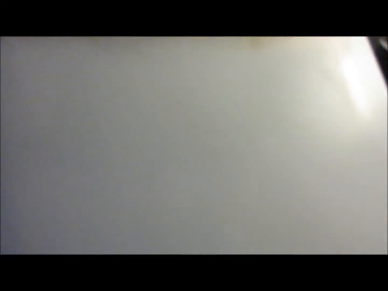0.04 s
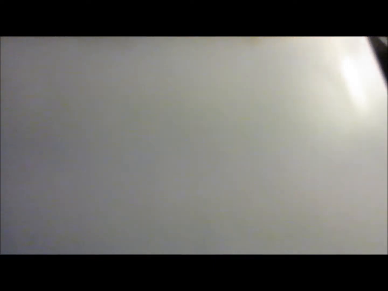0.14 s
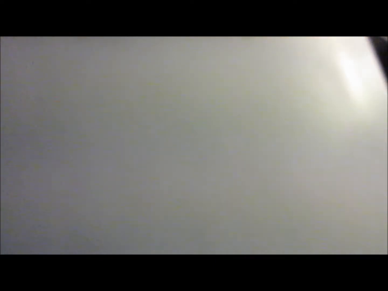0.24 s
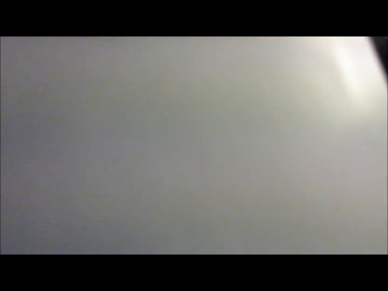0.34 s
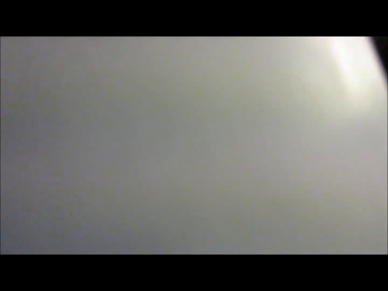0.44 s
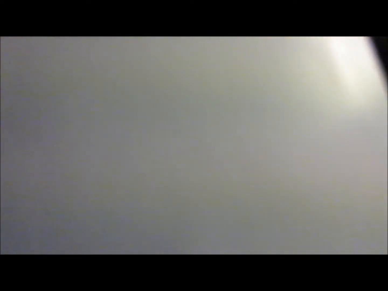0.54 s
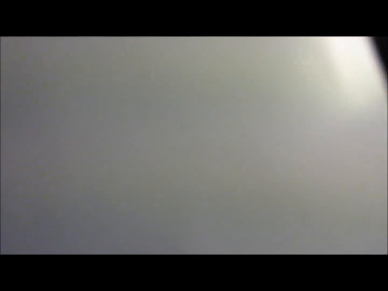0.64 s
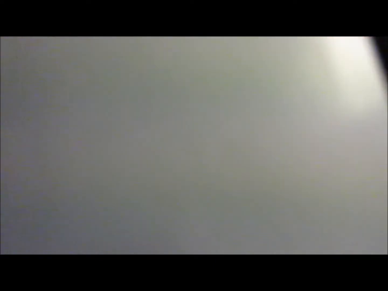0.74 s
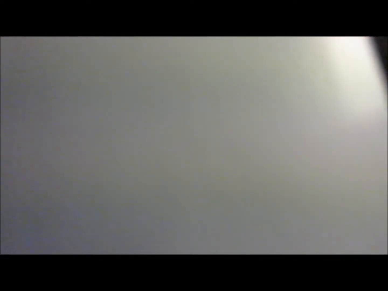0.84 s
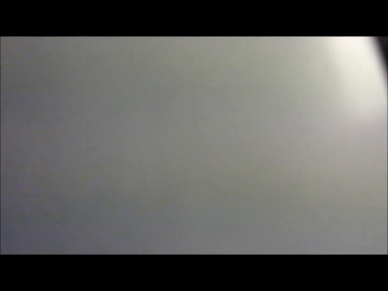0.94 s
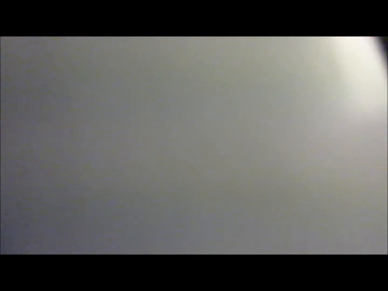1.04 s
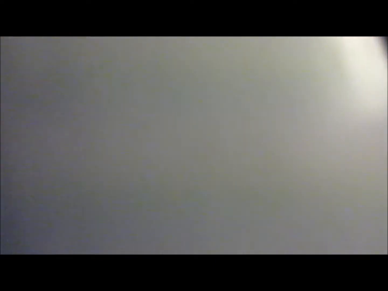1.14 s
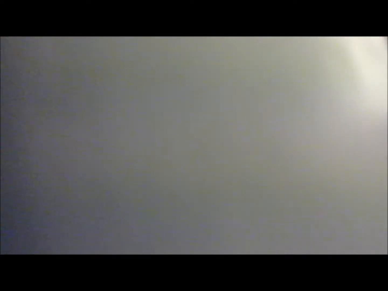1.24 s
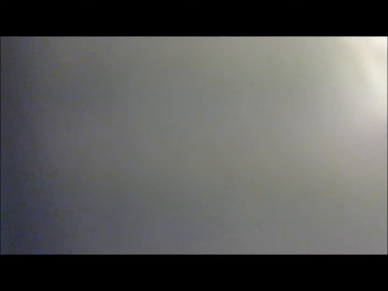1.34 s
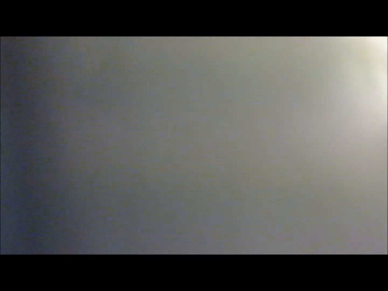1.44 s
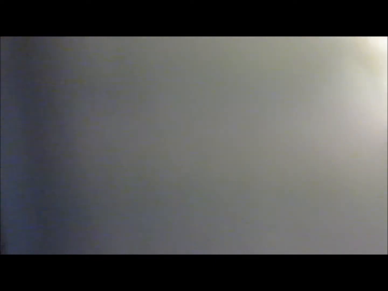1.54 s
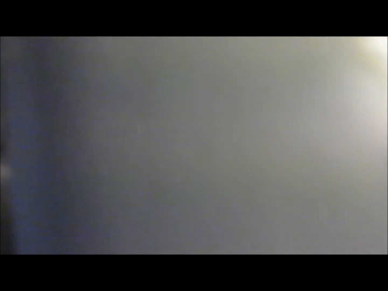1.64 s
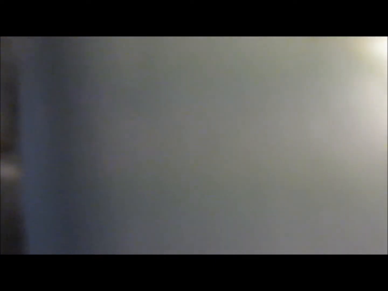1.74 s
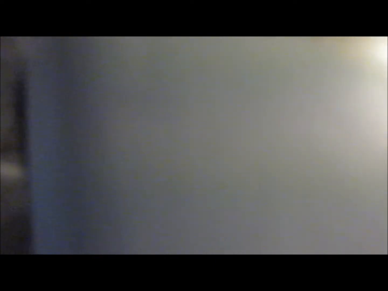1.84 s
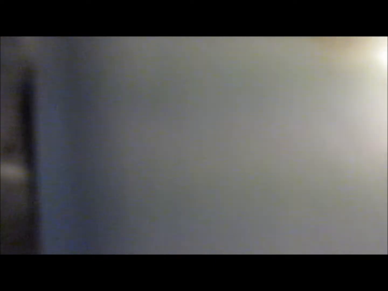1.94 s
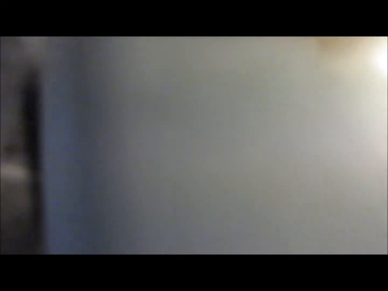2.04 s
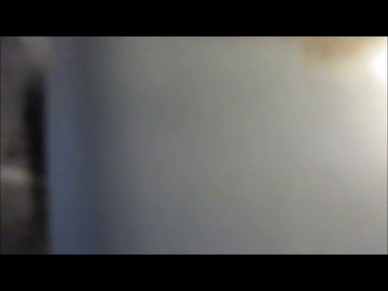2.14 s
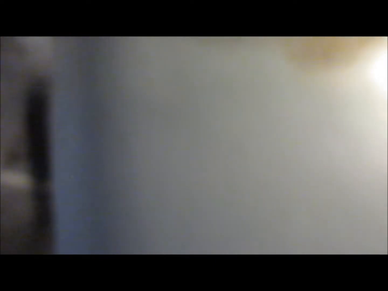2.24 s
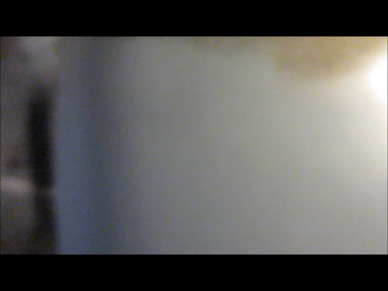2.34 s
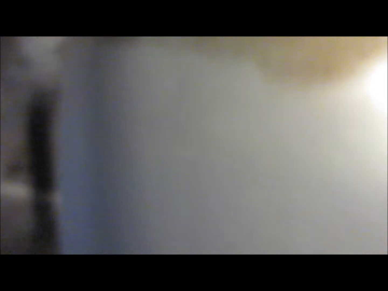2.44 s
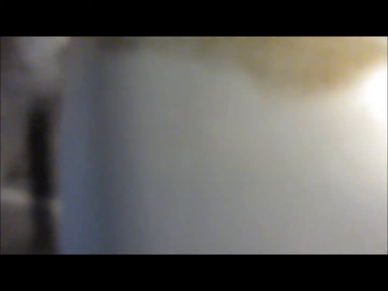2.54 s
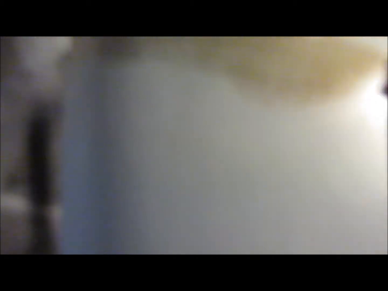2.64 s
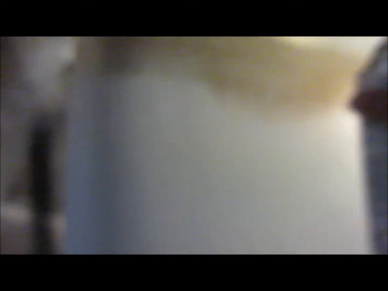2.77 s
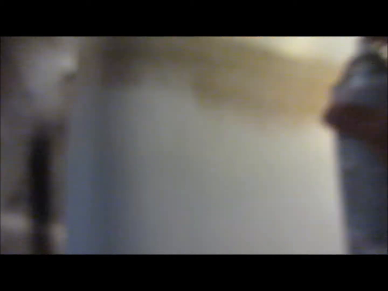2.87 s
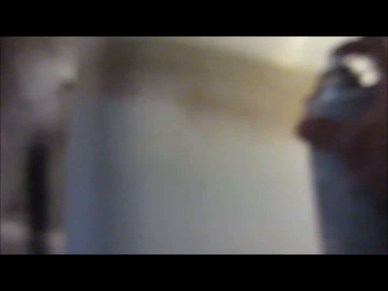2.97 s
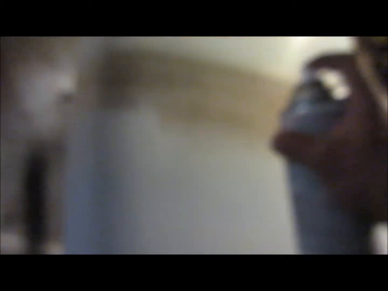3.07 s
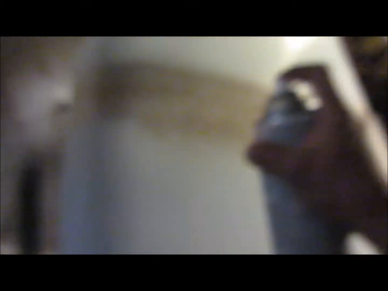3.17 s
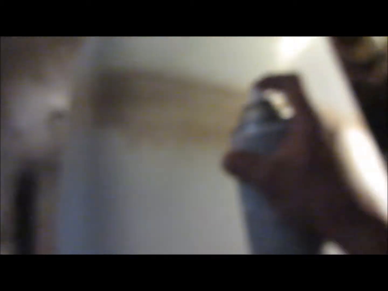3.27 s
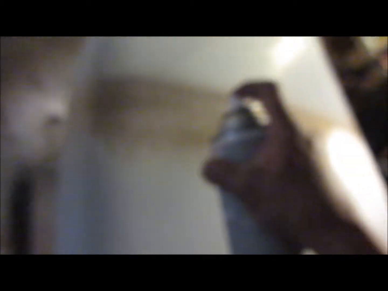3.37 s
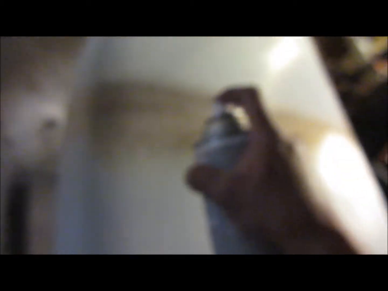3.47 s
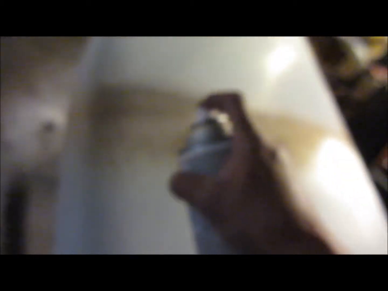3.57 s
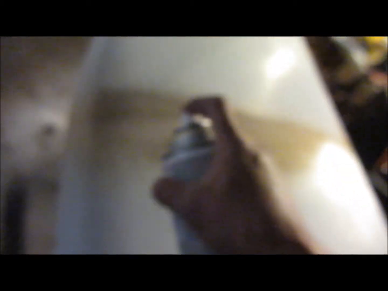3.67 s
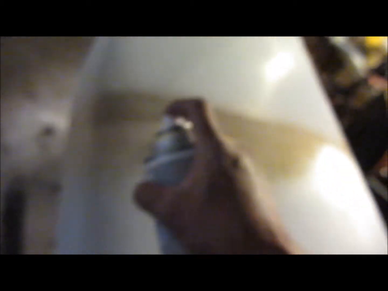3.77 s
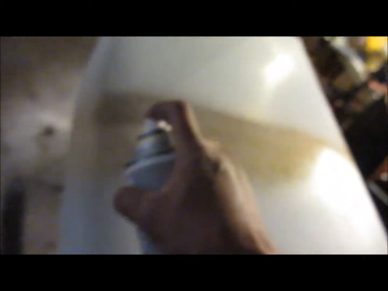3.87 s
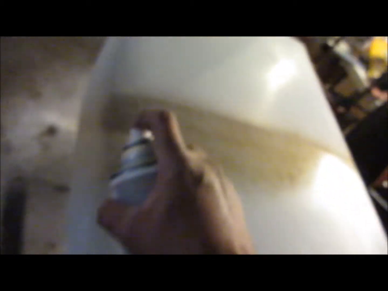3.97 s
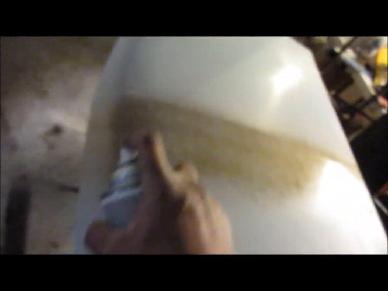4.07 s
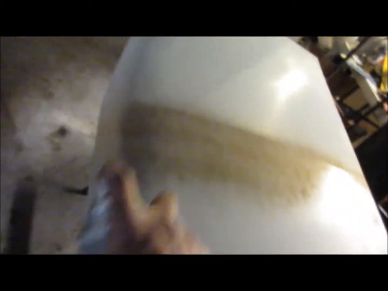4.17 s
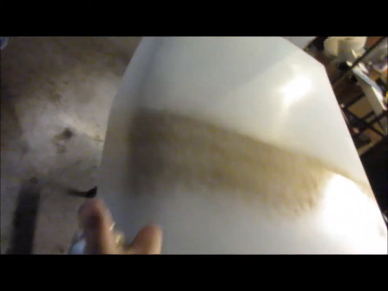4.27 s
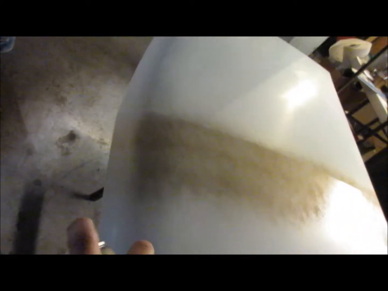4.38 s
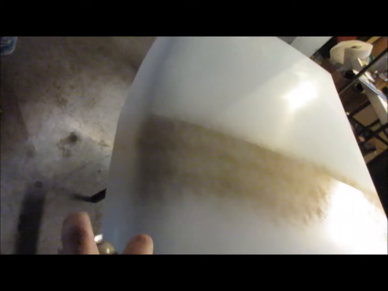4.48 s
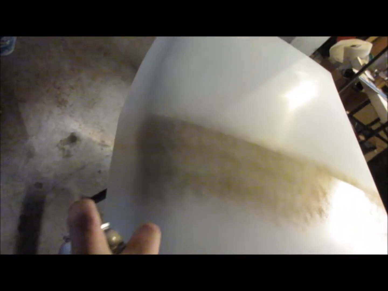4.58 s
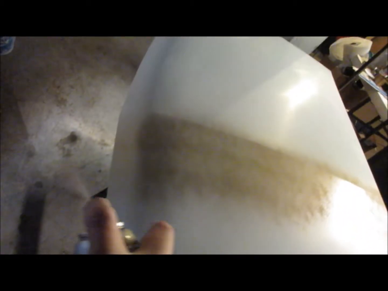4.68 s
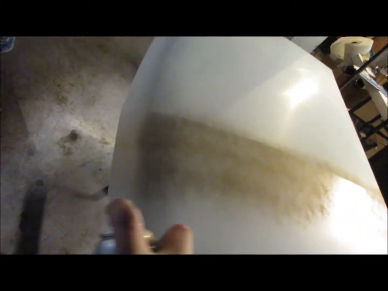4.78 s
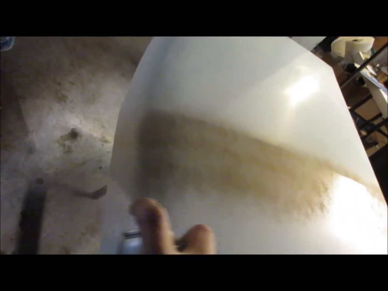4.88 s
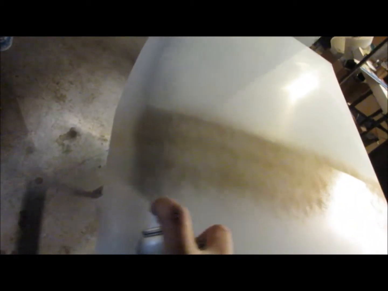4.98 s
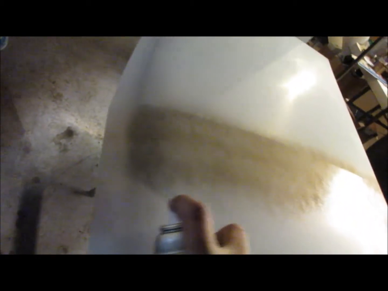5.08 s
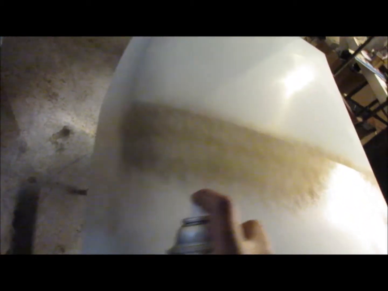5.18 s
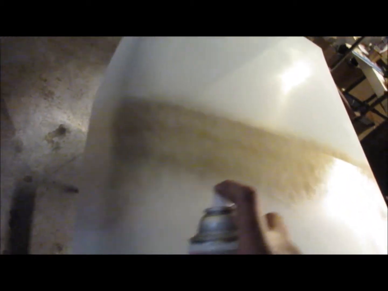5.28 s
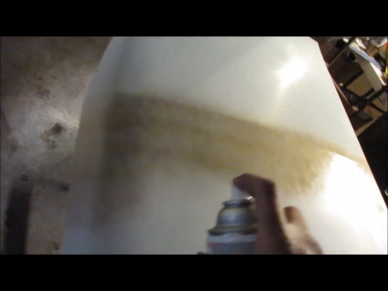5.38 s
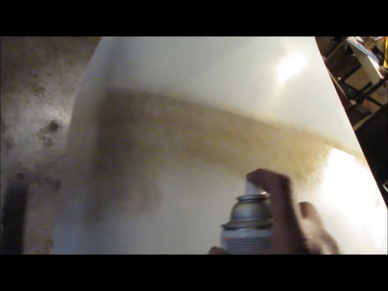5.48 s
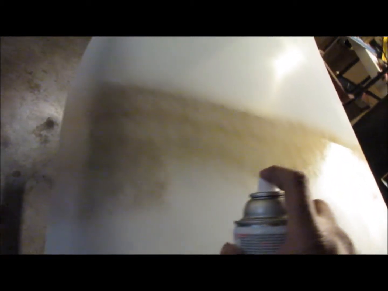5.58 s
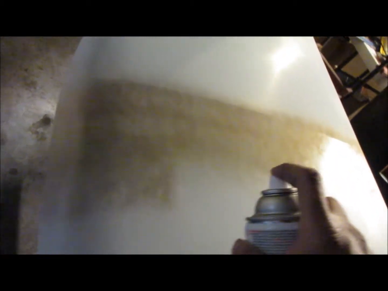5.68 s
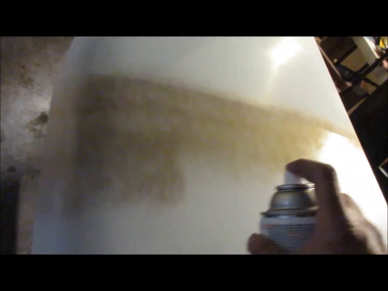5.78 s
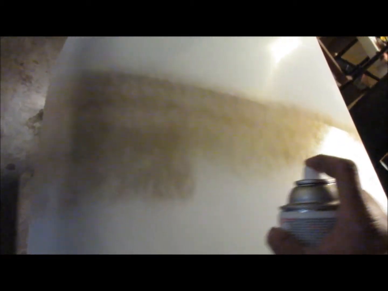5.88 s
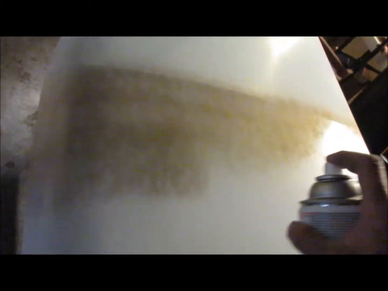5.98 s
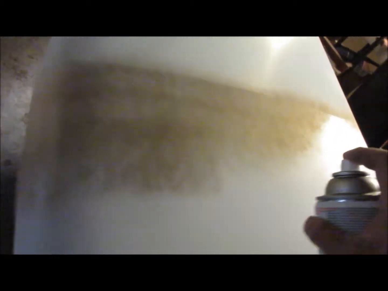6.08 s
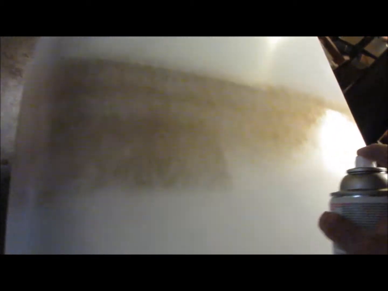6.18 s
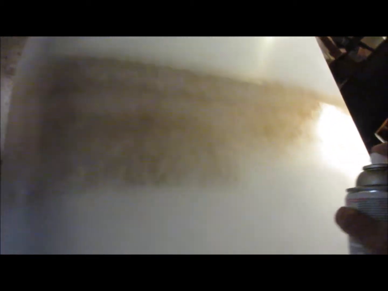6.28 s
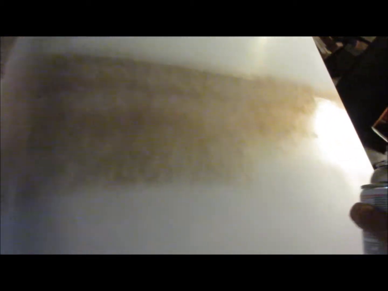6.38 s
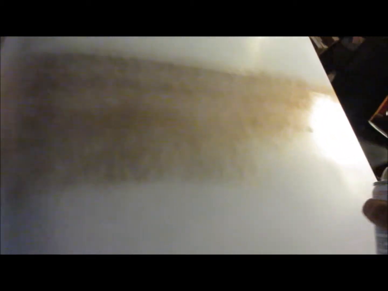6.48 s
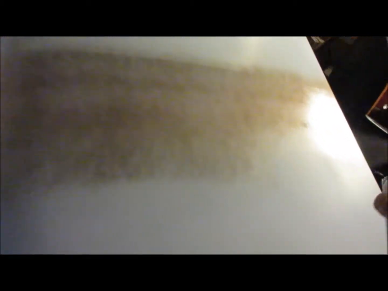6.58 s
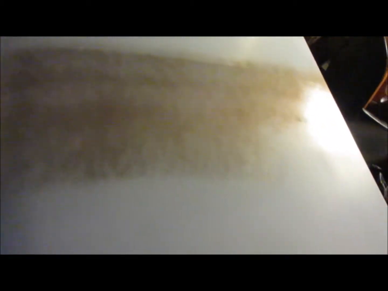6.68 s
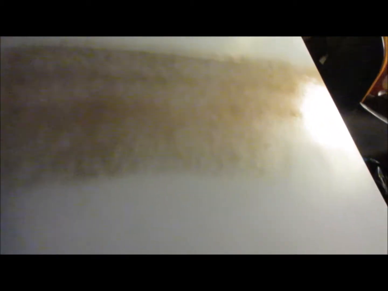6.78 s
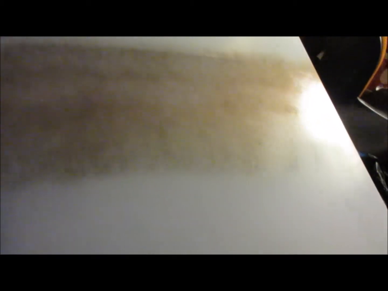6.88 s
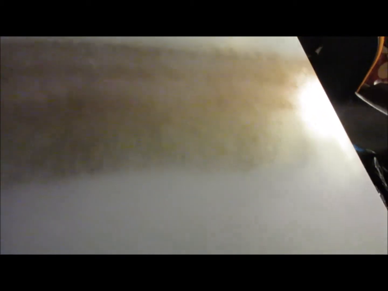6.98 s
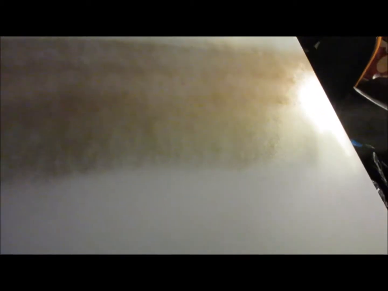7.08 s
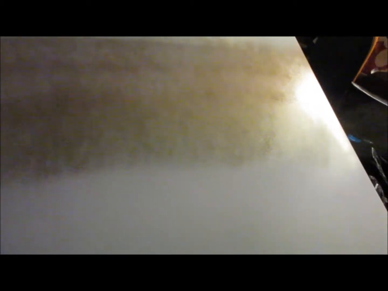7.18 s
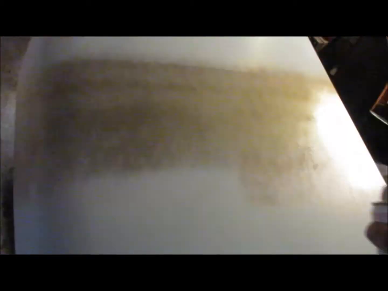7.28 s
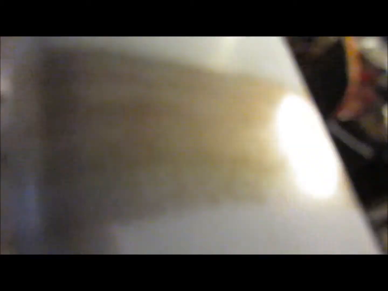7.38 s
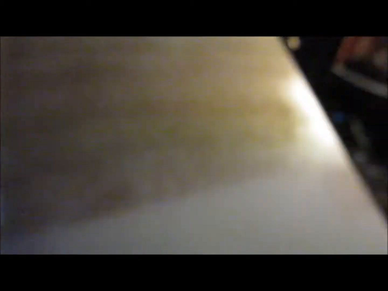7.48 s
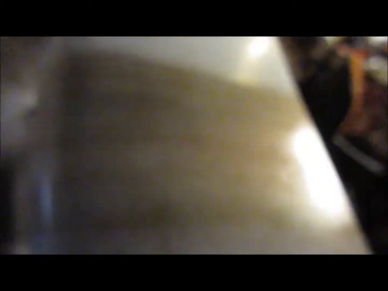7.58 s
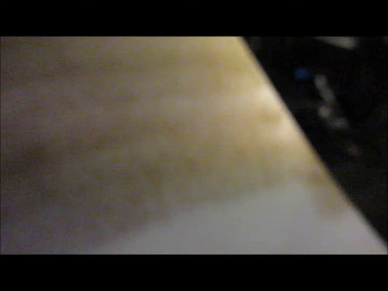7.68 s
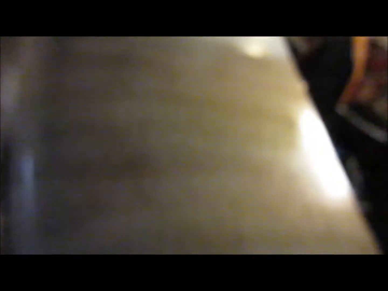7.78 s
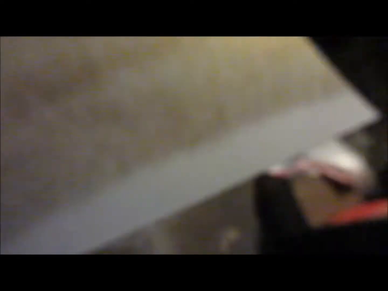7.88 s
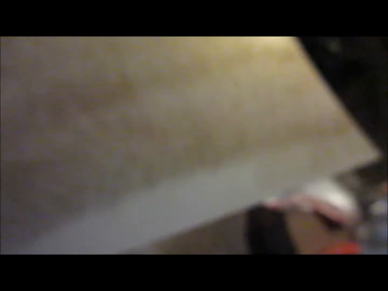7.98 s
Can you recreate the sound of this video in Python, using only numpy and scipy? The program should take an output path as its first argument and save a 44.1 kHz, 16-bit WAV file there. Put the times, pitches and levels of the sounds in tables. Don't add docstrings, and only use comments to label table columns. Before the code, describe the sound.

Already spraying at the start, an aerosol can gives a sharp, bright hiss close to the microphone. It stops briefly, with tiny creaks and a click, then a long pass follows with scuffing underneath. After another half-second pause with soft scrapes, a louder, wetter pass runs until the sound cuts off. Quiet garage air, low rumble and lamp hum lie behind.

```python
import sys
import numpy as np
from scipy import signal
from scipy.fft import rfft, irfft
from scipy.io import wavfile

SR = 44100
rng = np.random.default_rng(int(sys.argv[2]) if len(sys.argv) > 2 else 0)


def field_ratio(decibels):
    return 10 ** (np.asarray(decibels, dtype=float) / 20)


def store_pcm(level_fs):
    pcm = np.round(np.clip(level_fs, -1, 1) * 32767).astype(np.int16)
    wavfile.write(sys.argv[1], SR, np.atleast_2d(pcm).T)


N = 353682
TIME = np.arange(N) / SR


def rms_one(x):
    return x / np.sqrt(np.mean(x ** 2) + 1e-20)


def in_time(rows):
    seconds, *columns = np.transpose(rows)
    return [np.interp(TIME, seconds, column) for column in columns]


def band(x, low_hz, high_hz):
    return signal.sosfilt(signal.butter(2, [low_hz, high_hz], "band", fs=SR, output="sos"), x)


def drift(rate_hz):
    step, settle = 16, 5998
    pole = np.exp(-2 * np.pi * rate_hz * step / SR)
    draws = rng.standard_normal(N // step + settle + 2)
    slow = signal.lfilter([1], [1, -2 * pole, pole * pole], draws)[settle:]
    return np.interp(np.arange(N) / step, np.arange(len(slow)), rms_one(slow - slow.mean()))


def coloured(points):
    hz = np.fft.rfftfreq(N, 1 / SR) + 1e-3
    point_hz, point_db = np.transpose(points)
    shape_db = np.interp(np.log(hz), np.log(point_hz), point_db)
    return rfft(rng.standard_normal(N)) * field_ratio(shape_db), hz


def swell(start_s, length_s):
    u = np.clip((TIME - start_s) / length_s, 0, 1)
    return np.clip(u / .12, 0, 1) * np.sqrt(1 - u ** 3.0)


# frequency in Hz, level in dB per Hz.
AIR_COLOUR = [(60, -17), (110, -6.5), (200, -5.5), (350, -2.5), (500, -6.5), (750, -6.5), (1100, 1),
              (1500, -7.5), (2000, -8), (3100, -9.5), (4000, -12), (7000, -20.5), (10000, -27),
              (15000, -40.5)]
# frequency in Hz, level in dB per Hz.
RUMBLE_COLOUR = [(12, -38), (22, -13), (40, -10.5), (48, -4.5), (58, -7), (70, 1.5), (82, -15), (92, -13),
                 (105, -16), (130, -49.5)]
# frequency in Hz, level in dB.
LAMP_HUM = [(120, -48.5), (180, -58.5), (202, -59), (240, -55), (300, -59), (360, -57.5), (420, -58.5),
            (600, -64.5)]


def garage():
    air_db, sinks_db_per_s = -43.5, 0.44
    stir_db = .8 * drift(3) + .6 * drift(25)
    air_db = air_db - sinks_db_per_s * (TIME - TIME.mean()) + stir_db
    air = field_ratio(air_db) * rms_one(irfft(coloured(AIR_COLOUR)[0], N))
    rumble_db = -43.5 + 1 * drift(4)
    rumble = field_ratio(rumble_db) * rms_one(irfft(coloured(RUMBLE_COLOUR)[0], N))
    phases = rng.uniform(0, 2 * np.pi, len(LAMP_HUM))
    hum = sum(np.sqrt(2) * field_ratio(db) * np.sin(2 * np.pi * hz * TIME + phase)
              for (hz, db), phase in zip(LAMP_HUM, phases))
    return air + rumble + hum


def room(x):
    t60_s, cut_hz, turns_per_s = 0.17, 2600, .3
    t = np.arange(SR // 2) / SR
    tails = rng.standard_normal((2, len(t))) * field_ratio(-60 * t / t60_s) * (t > .005)
    tails = signal.sosfilt(signal.butter(1, cut_hz, fs=SR, output="sos"), tails)
    turn = 2 * np.pi * turns_per_s * TIME
    return sum(signal.oaconvolve(x * share, tail / np.sqrt(np.sum(tail ** 2)))[:N]
               for share, tail in zip((np.cos(turn), np.sin(turn)), tails))


# start in seconds, length in seconds, low edge in Hz, high edge in Hz, level in dB.
RUSTLE_EVENTS = [(0.685, .03, 2000, 12000, -60), (0.768, 0.031, 6140, 8000, -47),
                 (.795, 0.038, 7000, 7500, -57.5), (0.854, 0.0076, 5000, 14500, -34),
                 (1.118, 0.056, 450, 720, -37), (1.6, 0.73, 3120, 3230, -38),
                 (4.43, 0.048, 3000, 10000, -55), (4.547, .1, 2930, 3160, -50),
                 (4.243, .08, 3100, 3280, -54), (4.62, 0.044, 3000, 9000, -53),
                 (4.717, 0.015, 2490, 13000, -34)]


def rustles():
    grain = rng.standard_normal(N) * field_ratio(1.8 * drift(80))
    return sum(field_ratio(db) * swell(s, length) * rms_one(band(grain, low_hz, high_hz))
               for s, length, low_hz, high_hz, db in RUSTLE_EVENTS)


# start in seconds, length in seconds, start pitch in Hz, end pitch in Hz, level in dB.
CREAK_EVENTS = [
    (0.55, .035, 8400, 8250, -50),
    (.56, 0.069, 1200, 1176, -50),
    (.61, 0.037, 1010, 1020, -41),
    (0.732, 0.089, 1090, 1067, -44),
    (0.823, 0.053, 1040, 1044, -44),
    (1.121, 0.046, 400, 314, -29),
    (1.33, .14, 145, 135, -41),
    (3.534, 0.043, 195, 225, -36.5),
    (4.59, 0.15, 135, 150, -45),
]


def creaks():
    octave_db, octave_fades_hz = -10.5, 500
    out, wobble = 0, field_ratio(1.5 * drift(60))
    for s, length, start_hz, end_hz, db in CREAK_EVENTS:
        pitch_hz = np.interp(TIME, [s, s + length], [start_hz, end_hz])
        phase = 2 * np.pi * np.cumsum(pitch_hz) / SR
        octave = field_ratio(octave_db) / (1 + (start_hz / octave_fades_hz) ** 2)
        tone = np.sin(phase) + octave * np.sin(2 * phase)
        out = out + np.sqrt(2) * field_ratio(db) * swell(s, length) * tone
    return out * wobble


# frequency in Hz, width in Hz, level in dB.
SOLE_RINGS = [(416, 130, -4.5), (822, 250, -0.5), (1096, 160, 1.5), (1450, 200, -2), (1740, 130, -5.5),
              (2090, 74, -9.5), (3100, 250, -11)]
# start in seconds, length in seconds, level in dB, brightness in dB per octave.
SCUFF_EVENTS = [
    (.655, 0.027, -55, -1),
    (.73, .03, -52, 0.3),
    (0.921, .17, -29.5, 3.5),
    (1.28, 0.69, -35, 4),
    (4.233, 0.074, -40, 5),
    (4.3, 0.58, -50, 6),
    (4.435, 0.23, -45.5, 1),
    (4.582, .19, -37, -1.5),
]


def scuffs():
    rise_s = .05
    grit = rng.standard_normal(N) * field_ratio(1.2 * drift(50))
    rings = [field_ratio(db) * rms_one(band(grit, hz - width / 2, hz + width / 2)) for hz, width, db in SOLE_RINGS]
    out = 0
    for s, length, db, tilt_db in SCUFF_EVENTS:
        drag = sum(field_ratio(tilt_db * np.log2(hz / 1000)) * ring for ring, (hz, *_) in zip(rings, SOLE_RINGS))
        rise = np.clip((TIME - s) / rise_s, 0, 1)
        out = out + field_ratio(db) * swell(s, length) * rise * rms_one(drag)
    return out


# frequency in Hz, level in dB per Hz.
NOZZLE_COLOUR = [(300, -18), (500, -16), (750, -8.5), (1200, -9), (1900, -5), (2600, -5.5), (3500, -0.5),
                 (5200, -1.5), (6500, -2), (7300, 0.5), (8800, 0.5), (10200, -3), (14600, -3),
                 (20000, -10.5)]
# opens in seconds, closes in seconds, opening time in seconds,
# closing time in seconds, wetness of the coat in dB.
VALVE_PRESSES = [
    (-.1, 0.48, .01, .02, -1.5),
    (.859, 4.2, 0.0095, .02, 0.67),
    (4.722, 7.5, .018, .01, 2.5),
]
# time in seconds, hiss level in dB, nozzle turned away from 0 to 1.
CAN_TRAVEL = [(0.0, -23.3, 0), (0.47, -24.5, .42), (0.89, -26, 0.2), (1.12, -24.5, 0), (1.55, -24, 0.06),
              (2.64, -23, 0.14), (3.12, -23.5, 0.54), (3.55, -24, 0.27), (4.1, -25, 0.9),
              (4.19, -26.5, 0.9), (4.76, -23, 0.6), (4.81, -21.5, 0.75), (4.97, -24, 0.9), (5.14, -20, 0.9),
              (5.29, -20.5, 0.9), (5.61, -21, 0.82), (6.07, -19.5, 0.67), (7.33, -22, 0.37)]


def jet(sputter_db, flutter_db, surge_db):
    noise, hz = coloured(NOZZLE_COLOUR)
    below_mist, below_body, below_main = [1 / (1 + (hz / edge) ** 20) for edge in (2300, 4500, 12800)]
    shares = below_main - below_body, 1 - below_main, below_body - below_mist, below_mist
    main, fine, body, mist = [rms_one(irfft(noise * share * (hz < 15500), N)) for share in shares]

    hiss_db, turned = in_time(CAN_TRAVEL)
    presses = np.array(VALVE_PRESSES)
    wet_db = presses[np.searchsorted(presses[:, 0], TIME) - 1, -1]
    round_ms = in_time(PANEL_PATH)[0] - 1
    fine_db = -7 - 8.5 * turned
    body_db = -10 + 2.5 * round_ms + 2.5 * (turned - .5) + wet_db
    mist_db = -12 + 7.5 * round_ms + .4 * wet_db - 3 * turned
    mist_db = mist_db - (1 - .35) * (hiss_db - hiss_db.mean())
    hiss = main + field_ratio(fine_db) * fine + field_ratio(body_db) * body + field_ratio(mist_db) * mist

    unsteady = field_ratio(sputter_db * drift(400) + flutter_db * drift(40) + surge_db * drift(5.9))
    flow = sum(np.clip((TIME - opens) / rise, 0, 1) * np.exp(-np.maximum(TIME - closes, 0) / fall)
               for opens, closes, rise, fall, _ in VALVE_PRESSES)
    return hiss * field_ratio(hiss_db) * rms_one(unsteady) * flow


# time in seconds, extra path in milliseconds, strength in dB.
PANEL_PATH = [(0.05, 0.861, -10.5), (0.46, 0.8, -9), (0.9, 0.778, -10.7), (1.05, 0.818, -11.3),
              (1.35, 0.932, -10.5), (1.5, 0.956, -9.3), (2.25, 1.033, -9), (2.4, 1.075, -8.7),
              (3.3, 1.428, -8.8), (3.45, 1.468, -9.3), (3.9, 1.52, -15.5), (4.93, 1.494, -16),
              (5.33, 1.403, -15), (5.53, 1.346, -9), (5.98, 1.264, -8.8), (6.73, 1.093, -8.5),
              (7.03, 1.067, -8.8), (7.33, .987, -9)]
# start in seconds, length in seconds,
# fixed path in milliseconds, share of the panel path as a factor, level in dB.
WEAK_ECHOES = [
    (1.1, 1.3, 0, .835, -14),
    (3.2, .6, 0, .80, -15),
    (4.6, 1.0, 7.3, -1.15, -15),
    (1.0, .5, 4.55, 0, -18),
    (-.1, .7, .29, 0, -17),
    (2.8, 1.3, .475, 0, -19),
    (3.3, 1.0, .345, 0, -18),
    (4.6, .75, .17, 0, -11.5),
    (5.2, .8, .12, 0, -19),
    (6.4, 1.2, .19, 0, -17),
]


def panel(x):
    path_ms, bounce_db = in_time(PANEL_PATH)
    thin = signal.sosfiltfilt(signal.butter(1, 1300, "high", fs=SR, output="sos"), x)
    fine = signal.resample(thin, 4 * N)

    def late(ms):
        return np.interp(4 * (np.arange(N) - ms * SR / 1000), np.arange(4 * N), fine, left=0)

    strength = field_ratio(bounce_db + 3.0)
    out = x + strength * late(path_ms + .002)
    for s, length, base_ms, share, db in WEAK_ECHOES:
        out = out + field_ratio(db) * swell(s, length) * late(base_ms + share * path_ms)
    for ms in np.geomspace(1.9, 16, 24):
        out = out + field_ratio(-23.5 + 4.0 * drift(0.27)) * late(ms + .2 * drift(0.37))
    return out / np.sqrt(1 + strength ** 2)


def scene():
    room_db = -17
    spray = panel(jet(sputter_db=1.0, flutter_db=0.19, surge_db=0.3))
    mono = garage() + field_ratio(room_db) * room(spray) + rustles() + creaks() + scuffs() + spray
    return np.array([mono, mono])


def splits(mono, stop_s):
    count, length_s, level_db, width_hz = 19, .034, -2, 1500
    side, size = np.zeros(N), round(length_s * SR)
    hz = np.fft.rfftfreq(size, 1 / SR)
    for k, (when, where) in enumerate(rng.random((count, 2))):
        at = round((k + when) / count * (stop_s * SR - size))
        low_hz = np.interp(where, [0, 1], (4200, 14200))
        other = np.roll(mono[at:at + size], size // 2)
        inside = (hz > low_hz) * (hz < low_hz + width_hz)
        side[at:at + size] += irfft(rfft(other) * inside, size) * np.hanning(size)
    return field_ratio(level_db) * side


def roll_off(x):
    return signal.sosfilt(signal.butter(12, 16290, fs=SR, output="sos"), x)


def record(dry):
    stop_s, cutoff_hz = 7.347, 15050
    top_cut = signal.ellip(12, .2, 80, cutoff_hz, fs=SR, output="sos")
    track = signal.sosfilt(top_cut, dry) * (TIME < stop_s)
    mix = track + splits(track[0], stop_s) * [[1], [-1]]
    return roll_off(mix)


dry = scene()
out = record(dry)
store_pcm(out)
```